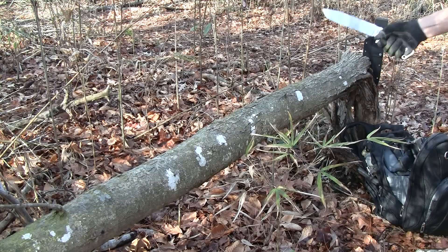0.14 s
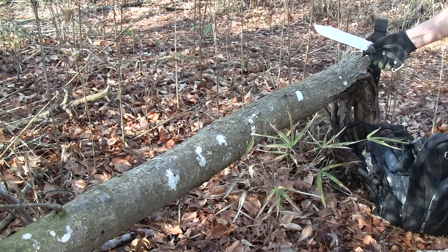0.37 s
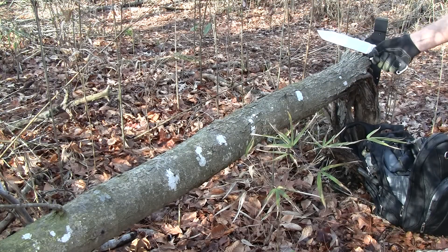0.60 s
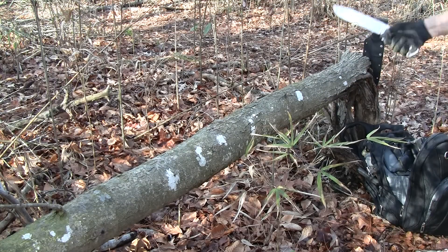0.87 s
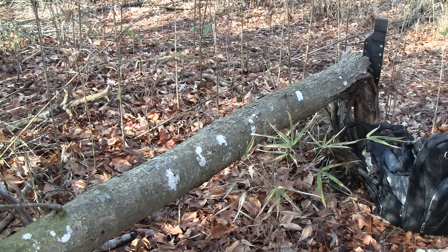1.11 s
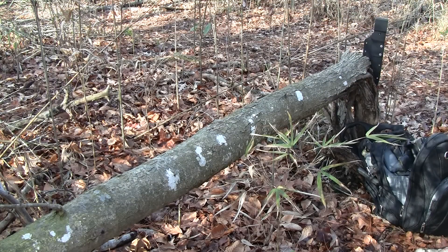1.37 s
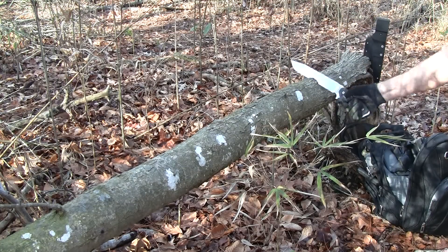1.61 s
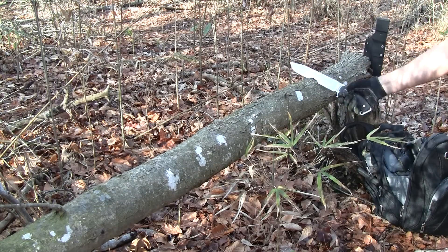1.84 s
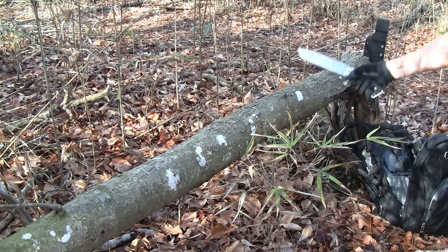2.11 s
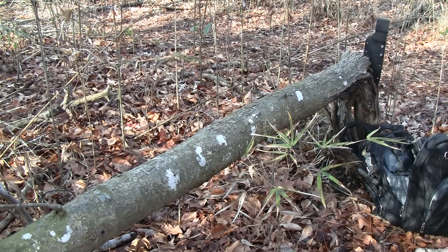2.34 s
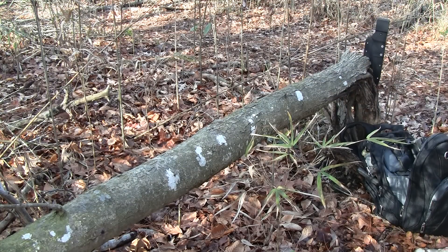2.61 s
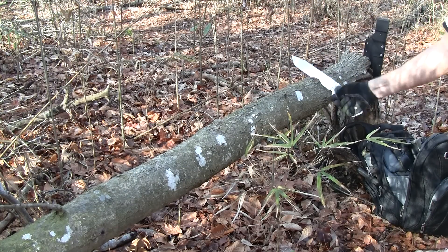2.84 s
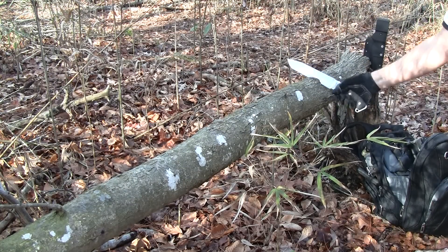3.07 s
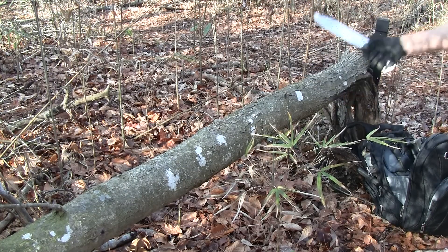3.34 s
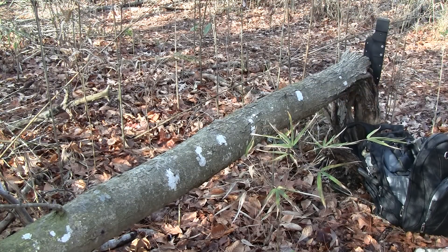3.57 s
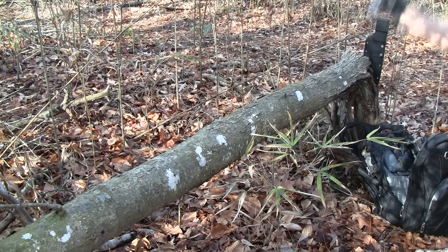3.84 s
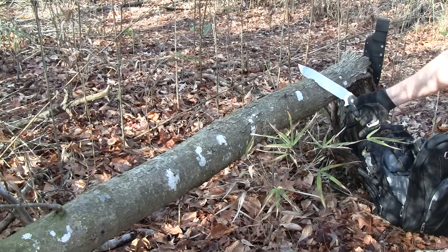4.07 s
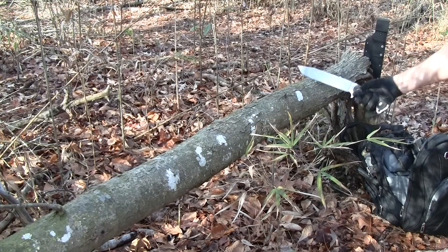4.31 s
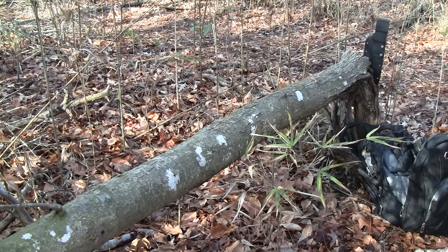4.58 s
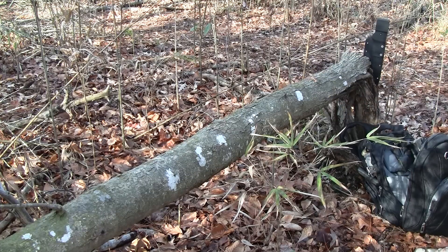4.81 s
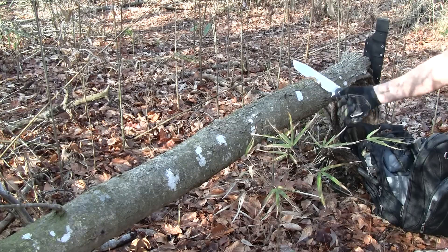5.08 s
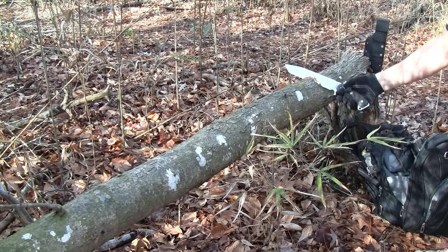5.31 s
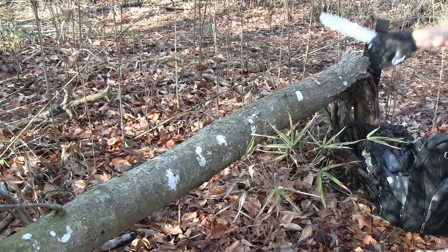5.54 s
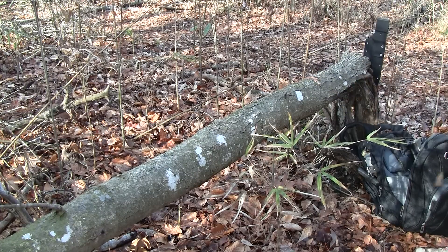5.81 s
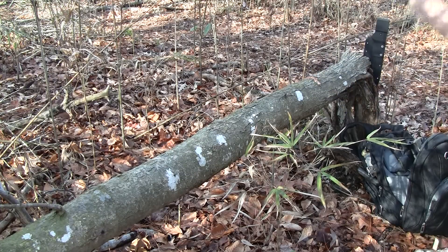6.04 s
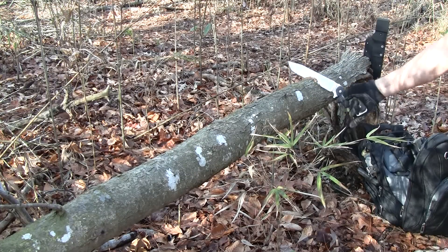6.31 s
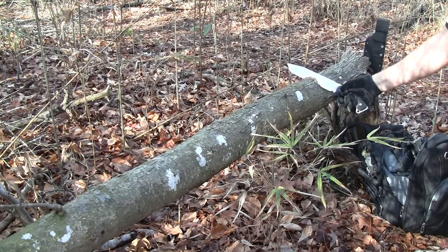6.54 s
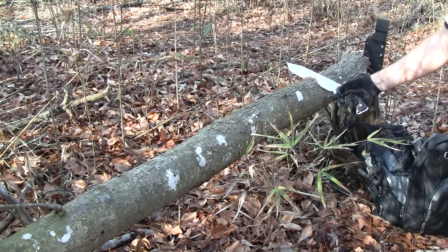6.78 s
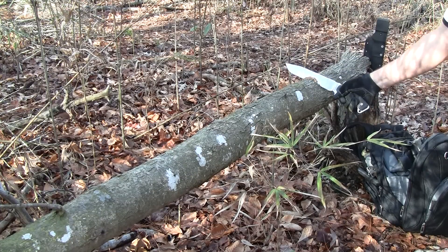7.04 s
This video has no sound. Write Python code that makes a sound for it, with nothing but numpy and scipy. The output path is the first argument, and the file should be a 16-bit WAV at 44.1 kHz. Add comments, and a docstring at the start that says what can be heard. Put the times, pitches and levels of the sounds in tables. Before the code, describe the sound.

In open woodland, a soft dull hush and a faint low engine drone lie behind crackling dry leaves and a brief cloth swish. Then a heavy knife chops a log five times, close to a stereo microphone that clips. Each blow is a short air rush, a hard woody crack with splitting fibres and a short hollow thud, then a swelling echo from the trees. Chips tick on leaves between blows.

```python
"""Dry leaves crackle and tick and a sleeve swishes, over the hush of open woodland and a far engine's drone.
Then a heavy knife is chopped five times into a fallen log, close to a stereo microphone that overloads.
Each blow is a rush of air noise, a bank of ringing log modes, a crack with a blade ring, and bursts of
snapping fibres; shaped noise makes the swelling echo of the trees. Leaves, chips and twigs are short rings
and snaps, the sleeve and the hush are coloured noise, and the engine is a stack of sine orders."""
import sys
import numpy as np
from scipy import signal
from scipy.io import wavfile

SR = 44100
rng = np.random.default_rng(int(sys.argv[2]) if len(sys.argv) > 2 else 0)


def dump_mix(stems):
    """Bounce the given channels to the path in sys.argv[1] as a 16-bit WAV at rate SR."""
    frames = np.atleast_2d(stems).T  # one column per channel
    limited = np.clip(frames, -1, 1)  # hard clip at full scale
    pcm = np.round(limited * 32767).astype(np.int16)
    wavfile.write(sys.argv[1], SR, pcm)


def magnitude_from_level(level_db):
    """Linear magnitude for a level in decibels (20 dB per decade)."""
    exponent = np.asarray(level_db, float) / 20
    return 10 ** exponent


N = 315872   # length in samples


def rms_one(x):
    """Scale to unit rms."""
    return x / np.sqrt(np.mean(x ** 2) + 1e-20)


def in_time(rows):
    """Draw each column of a (seconds, values..) curve out to every sample."""
    s, *columns = np.transpose(rows)
    return [np.interp(np.arange(N) / SR, s, column) for column in columns]


def at_hz(points, hz):
    """Read a (Hz, value) curve on a log frequency axis."""
    curve_hz, values = np.transpose(points)
    return np.interp(np.log(hz), np.log(curve_hz), values)


def drift(rate_hz):
    """Slow random wander of unit rms: noise through two equal poles at rate_hz."""
    hop = 40   # computed at every 40th sample, then joined by lines
    r = np.exp(-2 * np.pi * hop * rate_hz / SR)
    noise = rng.standard_normal(N // hop + 2002)
    slow = rms_one(signal.lfilter([1], [1, -2 * r, r * r], noise)[2000:])
    return np.interp(np.arange(N) / hop, np.arange(len(slow)), slow)


def swell(t, s, db, rise, t60):
    """Gain that climbs to db at s and dies away; rise and t60 are seconds per 60 dB."""
    climb = (s - t) / max(rise, .01)
    fall = (t - s) / max(t60, .01)
    return magnitude_from_level(db - 60 * np.where(t < s, climb, fall))


def ring(x, hz, t60):
    """Two-pole resonance: a unit click sets a sine of height 1 ringing, 60 dB down after t60 seconds."""
    r, w = magnitude_from_level(-60 / (t60 * SR)), 2 * np.pi * hz / SR
    return signal.lfilter([0, np.sin(w)], [1, -2 * r * np.cos(w), r * r], x + 1e-18)


def cut(x, hz, kind, order=2):
    """Butterworth low- or high-pass."""
    return signal.sosfilt(signal.butter(order, np.clip(hz, 20, .45 * SR), kind, fs=SR, output="sos"), x)


def add(out, s, piece):
    """Lay a short sound into the track at s seconds."""
    i = round(s * SR)
    out[..., i:i + piece.shape[-1]] += piece[..., :N - i]


def bands(likeness, gain, size=N):
    """Half-octave bands of stereo noise, each with its own gain(hz) and left-right likeness."""
    out, edges = 0, 25 * 2 ** np.arange(0, 9.6, .5)
    white = rng.standard_normal((2, 2, size))   # neighbouring bands draw on different noise
    for k, (low, high) in enumerate(zip(edges, edges[1:])):
        band = signal.butter(2, [low, high], "band", fs=SR, output="sos")
        mid, side = signal.sosfilt(band, white[k % 2])
        hz = np.sqrt(low * high)
        alike = np.clip(at_hz(likeness, hz), -1, 1)
        stereo = np.sqrt(1 + alike) * mid + np.sqrt(1 - alike) * side * [[1], [-1]]
        out = out + gain(hz) * stereo
    return out


# Colour of the hush. Each row: frequency in Hz, relative level in dB per Hz.
HUSH_COLOUR = [(15, -56), (25, -26), (59, -19), (70, -11), (99, -6.5), (152, -9), (331, -7), (582, -10.5),
               (631, -9.5), (1240, -16), (1450, -15), (3260, -26.5), (5730, -28.5), (7110, -29.5),
               (15500, -30.5)]
# Stereo width of the hush. Each row: frequency in Hz, left-right likeness from -1 to 1.
HUSH_LIKENESS = [(60, 0.99), (150, 0.91), (380, 0.44), (950, 0.67), (2380, 0.59), (5980, 0.19),
                 (15000, -0.6)]


def hush():
    """Far traffic and air: dull noise that breathes slowly, partly all bands at once."""
    level_db = -45.5
    together = drift(0.073)

    def gain(hz):
        return magnitude_from_level(at_hz(HUSH_COLOUR, hz) + .6 * together + .7 * drift(3))

    return magnitude_from_level(level_db) * rms_one(bands(HUSH_LIKENESS, gain))


# Speed of the far engine. Each row: time in seconds, cycles per second.
ENGINE_SPEED = [(0, 21.4), (.7, 21.9), (2, 21.8), (2.5, 23.2), (3.5, 24.2), (3.9, 23), (4.2, 21.8),
                (4.8, 25.6), (5.3, 25.2), (6.9, 25), (7.16, 24.4)]
# Load of the far engine. Each row: time in seconds, level in dB.
ENGINE_LOAD = [(0, -51.5), (2, -54), (2.4, -55.5), (3.5, -55.5), (4.2, -55), (4.85, -50.5), (7.16, -48.5)]
# Steady orders of the engine. Each row: multiple of the cycle rate, level in dB relative to the load.
ENGINE_ORDERS = [(2, -23), (3, -32), (4, -4.5), (6, -19.5)]


def drone():
    """Low orders of a far engine that changes speed: sines at multiples of its cycle; neighbours beat."""
    (per_s,), (load_db,) = in_time(ENGINE_SPEED), in_time(ENGINE_LOAD)
    turn = 2 * np.pi * np.cumsum(per_s) / SR
    # the fifth order is strong at low speed and loses 5.5 dB per cycle per second above 21.76
    fifth_db = -1 - 5.5 * np.maximum(per_s - 21.76, 0)
    out = np.zeros(N)
    for order, db in ENGINE_ORDERS + [(5, fifth_db)]:
        rms = magnitude_from_level(load_db + db + 0.78 * drift(12))
        out += rms * np.sqrt(2) * np.sin(order * turn)
    return out


# Faint leaf crackle. Each row: time in seconds, ticks per second before clumping.
LITTER_RATE = [(0, 84), (.7, 23), (1.5, 59), (2.3, 106), (3.3, 82), (4, 65), (4.6, 45), (5.4, 25),
               (6.5, 113), (7.16, 130)]


def litter():
    """Tiny random snaps of dry leaves, in clumps, each ringing one of eight pitches in its own direction."""
    level_db = -36
    per_s, = in_time(LITTER_RATE)
    born = rng.random(N) < np.maximum(per_s, 0) * magnitude_from_level(5 * drift(6)) / SR
    sizes = magnitude_from_level(3 * np.minimum(rng.exponential(1, N), 3)) * rng.choice([-1, 1], N) * born
    dealt = rng.integers(0, 8, N)   # which pitch each snap gets
    pans = magnitude_from_level(rng.normal(0, 2.0, N) * [[.5], [-.5]])   # left minus right, spread in dB
    pitches_hz = np.geomspace(4000, 14000, num=8)
    rings = sum(ring(sizes * pans * (dealt == k), hz, 4 / hz) for k, hz in enumerate(pitches_hz))
    return magnitude_from_level(level_db) * cut(rings, 3900, "high")


# Cloth sweeping by. Each row: time in seconds, level in dB.
SLEEVE = [(0, -33), (.03, -38), (.08, -51.5), (.19, -46), (.28, -41), (.385, -33.5), (.49, -42),
          (.53, -51.5), (.6, -89)]
# Leaves stirred briefly. Each row: loudest moment in seconds, level in dB,
# rise in seconds per 60 dB (never under 0.01), t60 of the fall in seconds.
STIRS = [(2.35, -49, .18, 0.44), (3.04, -50.5, -1.7, 0.73), (5.991, -45.5, 0.5, 0.13)]
# Colour of cloth and stirred leaves. Each row: frequency in Hz, relative level in dB per Hz.
SWISH_COLOUR = [(290, -41), (500, -0.5), (553, -6), (759, -3.5), (1250, 1), (2430, -2.5), (4020, -6.5),
                (5840, -3), (15500, -9.5)]


def swish():
    """Sleeve and stirred leaves: grainy broad noise that swells with the movement."""
    t = np.arange(N) / SR
    gain = magnitude_from_level(*in_time(SLEEVE)) + sum(swell(t, *stir) for stir in STIRS)
    noise = rms_one(bands(ECHO_LIKENESS, lambda hz: magnitude_from_level(at_hz(SWISH_COLOUR, hz))))
    grain = magnitude_from_level(2.0 * drift(60))
    return gain * grain * noise


def squeak():
    """A faint rubbing squeak: a short puff of noise twice through one resonance."""
    middle_s, width_s, hz, level_db = 2.462, .017, 2500, -48
    note = ring(ring(rng.standard_normal(N), hz, .004), hz, .004)
    puff = np.exp(-.5 * ((np.arange(N) / SR - middle_s) / width_s) ** 2)
    return magnitude_from_level(level_db) * puff * rms_one(note)


# Dull knocks of wood nearby. Each row: start in seconds, level of the main ring in dB, its pitch in Hz,
# pitch ratio of the upper neighbour, level of that neighbour relative to the main ring in dB.
KNOCKS = [(0.012, -29.5, 937, 1.2, -4), (0.032, -30, 1450, 2, 2), (0.175, -28.5, 905, 1.64, 3),
          (1.381, -22.5, 760, 1.5, 3), (5.941, -33, 293, 2.05, 2.5), (5.976, -34.5, 447, 2.9, 6),
          (5.987, -26.5, 330, 1.9, -14)]


def knocks():
    """A soft contact, a short dulled noise burst, rings a short note and a higher neighbour."""
    out, t = np.zeros(N), np.arange(1600) / SR
    for s, db, hz, ratio, upper_db in KNOCKS:
        touch = cut(rng.standard_normal(len(t)) * np.exp(-t / 0.0024), 3900, "low", order=1)
        parts = [cut(ring(touch, f, 8.7 / f), 0.65 * hz, "high") for f in (hz, ratio * hz)]
        note = sum(magnitude_from_level(level) * part / abs(part).max() for part, level in zip(parts, (0, upper_db)))
        add(out, s, magnitude_from_level(db) * note)
    return out


# Chips and twigs on dry leaves. Each row: start in seconds, level in dB, ring in Hz,
# woody low part and dry top part, both in dB relative to the ring.
TICKS = [(0.027, -26, 4890, -4, -9), (.057, -24, 7800, -7, -22), (0.0715, -32, 3470, -12, -4),
         (0.1295, -28, 4660, -10, -10), (.148, -31.5, 3020, 3, -25), (0.159, -22.5, 2900, -4, -18),
         (.2145, -34, 4400, -15, -15), (.641, -36, 4870, 3.5, -8), (1.47, -27, 5700, -12, -18),
         (1.886, -40, 3840, -18, -20), (2.234, -35.5, 5780, -13, -16), (2.3345, -22.5, 3700, -20, -24),
         (2.355, -25.5, 6150, -27, -21), (2.3672, -25, 5430, -24, -20), (2.429, -31.5, 7740, -13, -11),
         (2.529, -38, 9680, -16, -5), (2.541, -29.5, 8200, -16, -8), (2.561, -34, 4100, -15, -11),
         (2.6474, -30, 3040, -9, -2), (2.716, -29.5, 3740, 0, -19), (2.751, -22, 4530, -9, -24),
         (2.771, -29, 4860, -25, -11), (3.0296, -16, 2660, -23, 6), (3.131, -33, 5560, -19, -10),
         (3.4277, -18, 4860, -1, -21), (3.461, -20, 6700, -14, -24), (3.537, -27, 5140, -12, -20),
         (3.5866, -22, 3930, -25, -26), (3.619, -25.5, 4640, -17, -21), (3.7263, -23, 4730, -3.5, 3),
         (4.212, -20, 4630, -5.5, -30), (4.294, -35, 3800, -13, -10), (4.5215, -29, 6730, -13, -23),
         (4.561, -28, 8850, -20, -7), (4.593, -28, 3020, -18, -3), (4.6688, -21, 6050, -9, -25),
         (4.8463, -26, 9790, -11, -8), (4.9913, -20, 2620, 4, 8), (5.0044, -19, 3620, -17.5, 0),
         (5.437, -31, 4130, -11, -27.5), (5.7074, -25.5, 5600, -18, 3), (5.941, -33, 4160, -9, -12),
         (5.9607, -21.5, 3400, -15, 2), (6.111, -28.5, 8800, -15, -5), (6.615, -33.5, 3760, -9, -10),
         (6.9234, -28.5, 6310, -23, -15), (6.975, -29, 6650, -7, -6), (7.1122, -33.5, 4380, 0, -11)]


def ticks():
    """Each tick is a ms-long burst of snaps: a broad ring, a woody low part and a dry top."""
    out, t = np.zeros((2, N)), np.arange(800) / SR
    fade = np.exp(-t / .0012) + magnitude_from_level(-17) * np.exp(-t / .008)
    for s, db, hz, low_db, top_db in TICKS:
        pan_db = rng.normal(-1.5, 0.5)   # left minus right
        burst = rng.standard_normal((3, len(t))) * fade
        wide = burst[0] + 0.45 * burst[1:]   # shared noise plus a little of each side's own
        body = cut(ring(wide, hz, 4 / hz), hz / 2, "high")
        wood = ring(burst[0], 1800, .004)
        top = cut(wide, 6500, "high")
        levels = zip((body, wood, top), (0, low_db, top_db))
        piece = sum(magnitude_from_level(level) * part / abs(part).max() for part, level in levels)
        add(out, s, magnitude_from_level(db) * cut(piece, 1000, "high") * magnitude_from_level([[pan_db / 2], [-pan_db / 2]]))
    return out


def swing():
    """Air torn by the falling blade: noise swells as it comes down and stops on contact."""
    level_db, rise_s = -26.5, 0.0073
    before = [s - np.arange(N) / SR for s, *_ in BLOWS]   # seconds left until each contact
    rush = sum((left > 0) * np.exp(-np.abs(left) / rise_s) for left in before)
    air = rng.standard_normal(N) + rng.standard_normal((2, N))   # shared, plus each side's own
    return magnitude_from_level(level_db) * rush * rms_one(cut(cut(air, 2800, "low", order=1), 270, "high"))


# Stands of trees that send the blow back. Each row: loudest moment in seconds after the blow,
# level in dB, rise in seconds per 60 dB, t60 of the fall in seconds.
TREES = [(.033, -47, 3, 0.35), (0.149, -50, 0.85, 0.87), (.3, -60, 1.5, 2.8)]
# Colour of the echo. Each row: frequency in Hz, level in dB.
ECHO_COLOUR = [(150, -30), (300, -19), (550, -14), (900, -9.5), (1400, -2.5), (2200, -10), (3200, -4.5),
               (4500, -4.5), (7000, -7.5), (10000, -8), (15000, -10)]
# Stereo width of the echo, lent to the swish too. Each row: frequency in Hz, left-right likeness, -1 to 1.
ECHO_LIKENESS = [(60, 0.78), (240, 1), (950, 0.91), (3770, 0.67), (15000, -0.37)]


def trees(x):
    """Countless trunks scatter the sound back as a swelling noise tail; the air dulls the late returns."""
    air_loss_db, patchy_db = 2.03, 2.0   # loss per second and kHz; unevenness from clumps of trunks
    t = np.arange(SR) / SR
    shape = np.sqrt(sum(swell(t, *stand) ** 2 for stand in TREES)) * (t > .008)

    def gain(hz):
        patches = patchy_db * drift(25)[:SR]
        return shape * magnitude_from_level(at_hz(ECHO_COLOUR, hz) + patches - air_loss_db * t * hz / 1000)

    echo = bands(ECHO_LIKENESS, gain, size=SR)
    return signal.fftconvolve(x[None], echo, axes=1)[:, :N]


# The blows. Each row: start in seconds, place along the log in radians per mode,
# length of the bite in ms, level of the crack in dB, blade ring in Hz.
BLOWS = [(1.5240, 0.12, 3.1, 19, 2590), (2.7933, 0.21, 2.8, 19, 2740), (3.9420, 0.56, 3.9, 20, 5000),
         (5.0540, 0.36, 3.7, 19, 2200), (6.1564, 0.037, 6.9, 25, 2300)]
# Modes of the log. Each row: frequency in Hz, level in dB, t60 in seconds.
LOG = [(129.8, -24, 0.35), (208.6, -28, 0.23), (272.4, -8, 0.12), (326.6, -2.5, 0.081), (386.5, -9.5, 0.17),
       (451, -14, 0.1), (552, -19, 0.22), (614, -8.5, 0.085), (681, -18, 0.12), (755, -6.5, 0.075),
       (815, -6, 0.059), (943, -12, 0.065)]
# Pushes on the log: the edge lands, then the blade stops in the wood.
# Each row: delay in seconds, level in dB, softness as a low-pass in Hz.
PUSHES = [(.0006, -11, 2500), (.0048, -1.5, 896)]


def blows():
    """Each blow: a hard first contact rings log and blade, then fibres snap while the edge bites."""
    blade_db, blade_low_hz = -24.5, 2190   # level under the crack, and reference pitch for its decay
    notch_hz, notch_t60_s, notch_db = 760.6, .014, -9   # the snaps ring the wood around the notch
    contact, fibres, t = np.zeros(N), np.zeros(N), np.arange(SR // 2) / SR
    click = (t == 0) * 1.
    push = -sum(magnitude_from_level(db) * np.roll(cut(click, hz, "low"), round(delay * SR)) for delay, db, hz in PUSHES)
    snap = cut(cut(click, 6000, "low", order=1), 550, "high")
    rap = click - np.roll(click, 2)   # starts the blade in step with the crack
    for s, place, bite_ms, crack_db, blade_hz in BLOWS:
        thud = np.zeros(len(t))
        for n, (hz, db, t60) in enumerate(LOG):
            # a mode stays quiet when struck near one of its nodes
            thud += magnitude_from_level(db) * np.cos(place * n) * ring(push, hz, t60)
        # the blade rings 3.4 bite lengths at the reference pitch, shorter above
        blade_t60_ms = 3.4 * bite_ms * (blade_low_hz / blade_hz) ** 2
        crack = snap + magnitude_from_level(blade_db) * ring(rap, blade_hz, blade_t60_ms / 1000)
        late_crack = np.roll(crack, round(0.000987 * SR))
        add(contact, s, cut(thud, 115, "high") + magnitude_from_level(crack_db) * late_crack)

        # force builds over 1.6 ms, holds through the bite and lets go
        force = np.minimum(t / .0016, 1) ** 2 * np.exp(-np.maximum(t - bite_ms / 1000, 0) / .0011)
        snaps = (force + magnitude_from_level(-5.0) * np.exp(-t / 0.0046)) * rng.standard_normal(len(t))
        notch = cut(ring(snaps, notch_hz, notch_t60_s), notch_hz / 2, "high")
        low = cut(cut(snaps, 1020, "low", order=4), 390, "high")
        high = cut(cut(snaps, 4260, "low"), 1310, "high")
        add(fibres, s, magnitude_from_level(notch_db) * notch + magnitude_from_level(19.0) * low + magnitude_from_level(13.5) * high)
    return contact, fibres


def scene():
    """Chop, echo and woodland together; the chopping reaches the left port a little late."""
    port_lag_s, log_pan_db = .000017, 1.9   # pan is left minus right
    contact, fibres = blows()
    chop = contact + fibres
    late = np.interp(np.arange(N) - port_lag_s * SR, np.arange(N), chop)
    near = np.array([late, chop]) * magnitude_from_level([[log_pan_db / 2], [-log_pan_db / 2]])
    background = hush() + drone() + litter() + swish() + squeak()
    return background + knocks() + ticks() + swing() + trees(contact) + near


def band_limit(x):
    """A steep low-pass at the top of the band."""
    return signal.sosfilt(signal.butter(12, 15670, fs=SR, output="sos"), x)


def record(dry):
    """The overloaded input clips flat, then a steep low-pass takes off the top."""
    clipped = np.clip(dry, -.98, .98)
    low_pass = signal.cheby2(10, 50, 16600, fs=SR, output="sos")   # 50 dB down from 16.6 kHz up
    mix = signal.sosfilt(low_pass, clipped)
    return band_limit(mix)


dry = scene()
out = record(dry)
dump_mix(out)
```